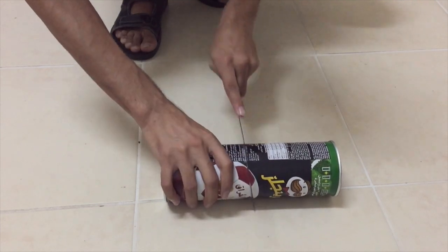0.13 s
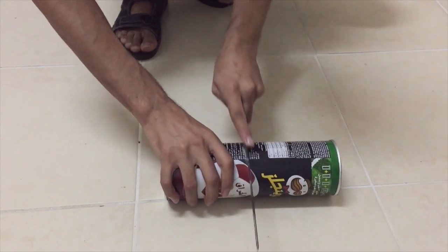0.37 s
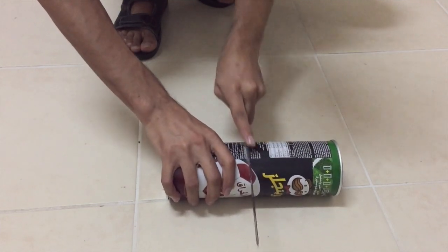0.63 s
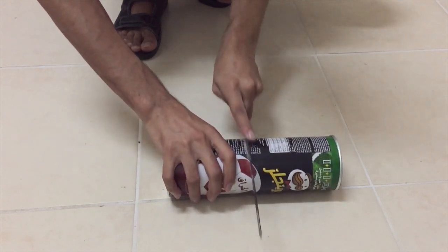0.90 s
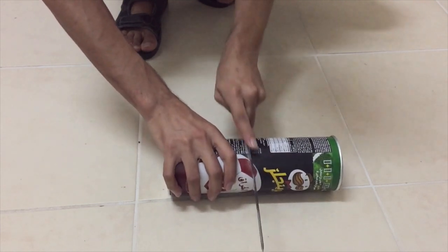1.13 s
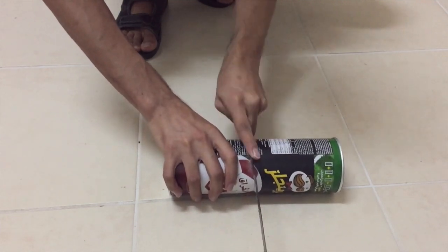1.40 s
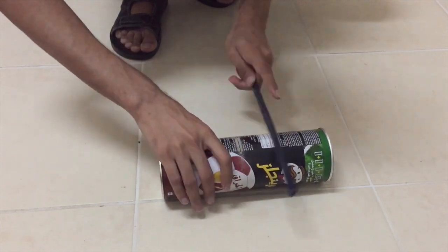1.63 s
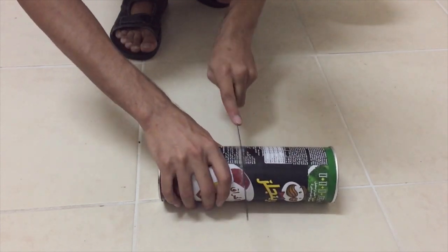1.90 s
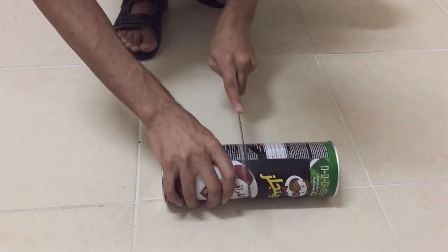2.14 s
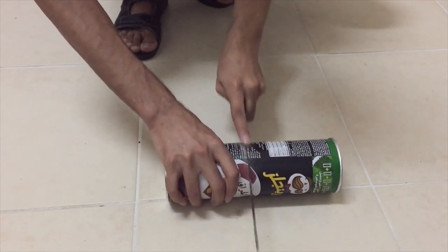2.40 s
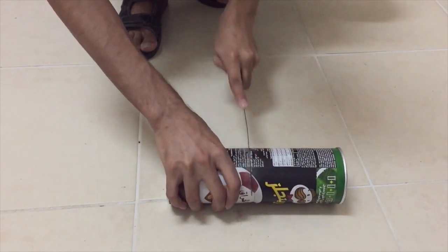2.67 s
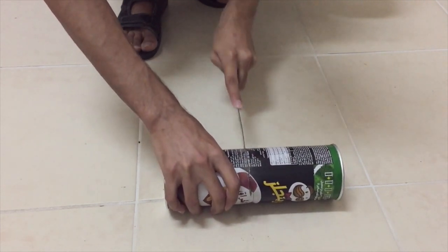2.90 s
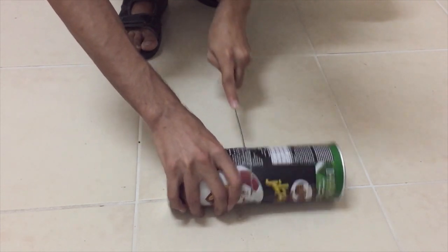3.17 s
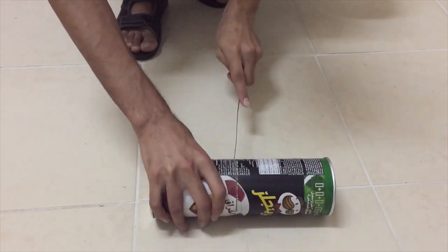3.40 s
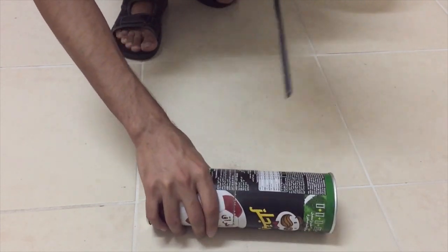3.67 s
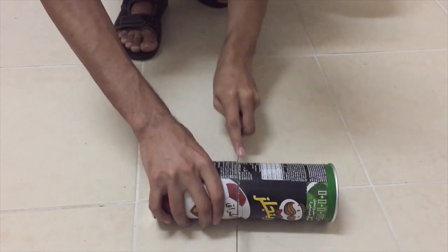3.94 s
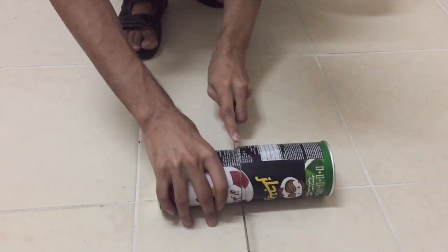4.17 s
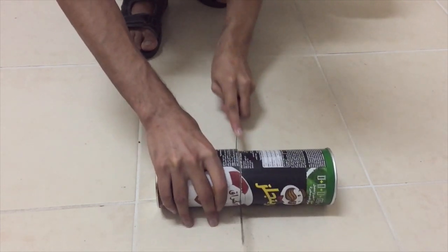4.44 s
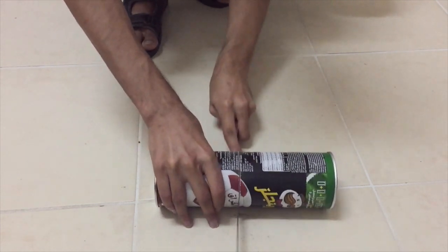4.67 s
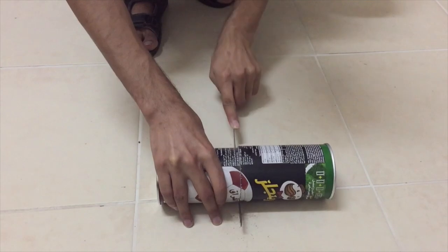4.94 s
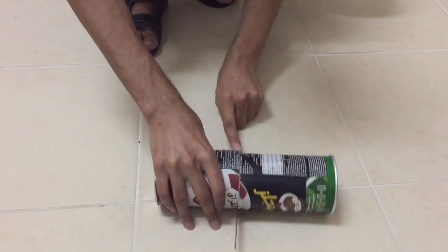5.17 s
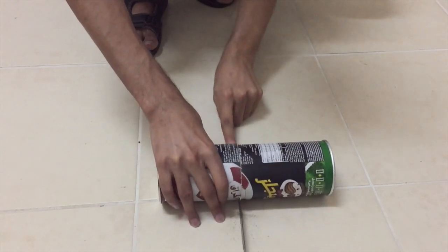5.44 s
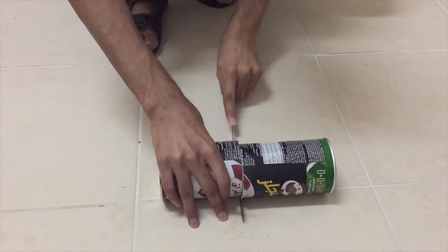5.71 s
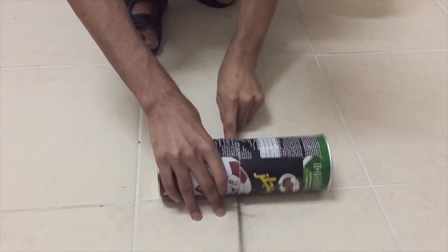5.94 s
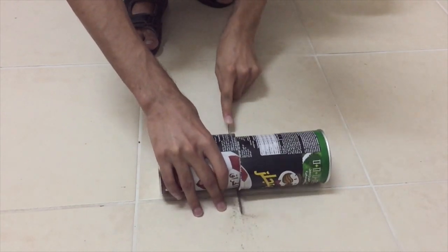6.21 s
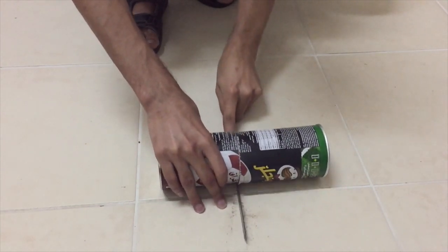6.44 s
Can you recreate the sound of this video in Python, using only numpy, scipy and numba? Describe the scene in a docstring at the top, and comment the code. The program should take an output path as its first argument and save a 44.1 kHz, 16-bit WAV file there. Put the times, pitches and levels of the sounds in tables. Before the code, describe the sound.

A thin hacksaw blade saws a hollow cardboard tube held on tiles in a small hard room. From 0 s come very quick, faint, dry strokes, about twenty-three a second, each with a small whine that rises and falls. They strengthen from 1 s and stop near 1.6 s, leaving faint scuffs, light taps and low hum. At 1.95 s sawing resumes, faster and steadily louder, fibres tearing and the tube ringing; it peaks around 3.1-3.3 s with soft thuds on the floor, ending on a sharp tap. Until 3.9 s there is only light dragging and tapping. A short burst to 4.1 s follows, then a long strong run from 4.25 to 5 s, hollow and clicking. After a brief gap, somewhat softer, higher-ringing strokes run from 5.15 s, with another tiny gap at 6.1 s, continuing to the cutoff at 6.6 s. Close phone microphone, short bright room tail.

```python
"""A bare hacksaw blade saws very quickly through a cardboard tube held on a tiled floor.
In each stroke the teeth whine up and down with the blade's speed (cosines at the tooth rate), fibres tear
and snap (shaped noise), and the hollow tube rings (resonances driven by both). Scrapes and light taps go
through the same tube, and short pulses thud on the tiles. Around it are a small hard room, a faint hum
and low noise, heard by a phone microphone."""
import sys
import numpy as np
from scipy import signal
from scipy.fft import rfft, irfft
from scipy.io import wavfile
from scipy.ndimage import uniform_filter1d
from numba import njit

SR = 44100
rng = np.random.default_rng(int(sys.argv[2]) if len(sys.argv) > 2 else 0)


def volts_from_db(level):
    """Convert decibel levels to linear amplitude ratios."""
    exponent = np.asarray(level, float) / 20
    return 10 ** exponent


def to_wav(s):
    """Save 16-bit WAV."""
    ch = np.atleast_2d(s).T  # columns
    pcm = np.round(np.clip(ch, -1, 1) * 32767)  # PCM
    wavfile.write(sys.argv[1], SR, pcm.astype(np.int16))


N = 290178  # length in samples
T = np.arange(N) / SR  # time in seconds

# The saw strokes. Each row: start in seconds, strength of the tearing in dB before mixing,
# top tooth rate in Hz, tooth whine over tearing in dB before mixing.
STROKES = [(0.027, -59, 2305, -2.5), (0.084, -59, 4345, -22), (0.127, -55, 2420, -5),
           (0.173, -58.5, 2350, -21), (0.216, -55.5, 2380, -22), (0.264, -58.5, 2686, -8),
           (0.309, -55.5, 2810, -11), (0.354, -57.5, 2330, -15), (0.397, -55.5, 2313, -16),
           (0.447, -58.5, 2920, -6), (0.492, -55.5, 2860, -6.5), (0.531, -58, 2382, -5),
           (0.58, -55, 2966, -11), (0.621, -58, 2397, -18), (0.666, -55.5, 2206, -8), (0.71, -58, 2990, -7),
           (0.758, -55.5, 2824, -10), (0.799, -58, 2873, -4), (0.852, -54, 2350, -2),
           (0.89, -59, 2420, -13), (0.935, -55, 2444, -4), (0.978, -57.5, 3015, -9), (1.024, -51, 3060, -4),
           (1.063, -57, 2366, -8), (1.109, -51, 3150, -10), (1.15, -54, 3350, 1), (1.199, -54, 3150, 3.5),
           (1.238, -54, 3300, -2), (1.286, -51, 3300, -3), (1.324, -55.5, 3097, -2.5),
           (1.371, -47, 3317, -1.5), (1.412, -56.5, 3280, -7), (1.455, -48.5, 3680, 3),
           (1.496, -48, 3400, -1), (1.547, -49, 3600, -9.5), (1.965, -47.5, 2785, -7),
           (1.99, -52, 2340, -19), (2.03, -49, 3650, -5), (2.072, -45, 3523, -4),
           (2.114, -50.5, 3165, -0.5), (2.159, -48.5, 3545, 3), (2.194, -50.5, 2992, -6),
           (2.238, -45.5, 3617, -2.5), (2.274, -56.5, 2300, 5), (2.314, -42.5, 3626, -3),
           (2.353, -47.5, 2392, -11), (2.392, -42.5, 3826, -4.5), (2.436, -48, 3582, -1),
           (2.47, -43, 3870, -2), (2.508, -43.5, 3178, -28), (2.548, -44.5, 3445, 0),
           (2.586, -46, 3208, -18), (2.625, -43, 3592, -4), (2.662, -46, 2443, -18),
           (2.701, -41.5, 3640, -5.5), (2.737, -46, 3728, -13), (2.776, -42, 2824, -2.5),
           (2.814, -50, 3173, -8), (2.85, -41, 2290, -9), (2.888, -49, 3258, -1), (2.927, -42, 2216, 1.5),
           (2.971, -50.5, 2186, -20.5), (3.006, -40.5, 2242, 0), (3.045, -49.5, 3578, -5),
           (3.082, -38, 2332, -26.5), (3.116, -45.5, 3580, -5), (3.147, -37, 4237, -4),
           (3.176, -40, 3525, -24), (3.203, -36.5, 4140, -1), (3.232, -45.5, 3517, -15),
           (3.259, -36, 4134, -3), (3.285, -43, 3500, -19), (3.317, -39.5, 4194, 0),
           (3.352, -42.5, 3306, -21), (3.929, -49, 4240, -24), (3.976, -45.5, 3210, -27),
           (4.015, -37.5, 4140, -5), (4.05, -40.5, 3900, -8), (4.079, -38, 3386, -19),
           (4.25, -51, 3104, -19), (4.295, -47, 2236, -15.5), (4.336, -40.5, 4330, -5),
           (4.37, -40, 3064, -10), (4.412, -40.5, 3252, -7), (4.444, -39, 4223, -9), (4.485, -39, 3320, -9),
           (4.514, -39.5, 3867, -7.5), (4.557, -43.5, 3194, -3), (4.588, -38.5, 3150, -11),
           (4.626, -38, 3371, -15), (4.661, -39, 3754, -6), (4.697, -37, 3408, -20), (4.729, -40, 3498, -6),
           (4.766, -37.5, 3373, -25), (4.8, -38.5, 4030, -7), (4.836, -38, 3703, -11),
           (4.874, -39, 4243, -24), (4.906, -38, 3808, -14), (4.944, -40, 3135, -17),
           (4.985, -44.5, 1695, -9), (5.109, -61, 4127, -6.5), (5.145, -46, 3775, -25),
           (5.177, -38, 3400, -12), (5.216, -47.5, 4343, -21), (5.245, -43, 4240, -22),
           (5.275, -43, 2738, -6), (5.303, -45, 2223, -20), (5.342, -42, 2350, -3), (5.372, -39, 3574, -13),
           (5.409, -45, 3021, -6), (5.44, -42, 2918, -6), (5.476, -45, 2850, -3.5),
           (5.509, -43, 4097, -7.5), (5.548, -45.5, 3153, -0.5), (5.581, -46, 3333, -3),
           (5.62, -46.5, 3314, 0.5), (5.659, -45.5, 4080, -7), (5.695, -46.5, 2822, -19),
           (5.726, -53.5, 4147, -17), (5.769, -58, 3972, -17), (5.794, -44.5, 2334, -30),
           (5.833, -45.5, 2373, -3.5), (5.863, -45, 3183, 2.5), (5.902, -46, 3228, -4),
           (5.936, -43.5, 3190, -2.5), (5.972, -45, 3072, -7), (6.005, -47.5, 3693, -3.5),
           (6.042, -47.5, 3370, 4.5), (6.076, -65.5, 3676, -3), (6.148, -54.5, 3800, -13),
           (6.192, -48, 2547, -7), (6.227, -41.5, 3196, -9.5), (6.262, -46, 2881, -4),
           (6.293, -42, 2972, -23), (6.33, -46, 3240, -1), (6.359, -46, 3217, -6), (6.393, -45.5, 3336, -1),
           (6.424, -43.5, 2446, -31.5), (6.461, -45, 3388, -4), (6.491, -44.5, 3562, 2.5),
           (6.524, -48, 3600, -5.5), (6.558, -45.5, 2364, -0.5)]
# How the hand works. Each row: time in seconds, time to turn round in ms, jolt at the stroke's start (0-1),
# roundness of the stroke's swell (a power), how strongly the wall rings under the other hand's grip in dB.
HAND = [(0, 3, 0.16, 1.15, 5), (1.6, 2.6, 0.17, 1.35, 3), (2.5, 3.5, 0.3, 1.7, 0), (3.0, 3, .3, 1.5, -2),
        (3.4, 2, 0.18, 1.36, -2), (4.0, 5, .25, 1.2, -2), (4.35, 10, 0.12, .65, -3),
        (4.7, 11, .15, .65, -4), (5, 7, 0.35, 1, -4), (5.4, 5.5, 0.35, 1.2, 0), (5.8, 5, 0.35, 0.95, -1),
        (6.58, 4.5, 0.42, 1.1, -1)]
# When the teeth sing. Each row: time in seconds, share of the stroke done when the whine is loudest (0-1).
WHINE_PEAK = [(0, .5), (1.4, .48), (1.55, .38), (2.5, .39), (3.3, .42), (4.5, .4), (5.6, .38), (6.58, .4)]
# The tube as the cut deepens. Each row: time in seconds, lower tube mode in Hz, its width in Hz,
# upper tube mode in Hz, upper mode's level in dB, tube over tearing in dB before mixing.
KERF = [(0, 1275, 55, 1870, 1, -3), (1.5, 1267, 55, 1920, 0.5, -1.5), (1.63, 1378, 80, 1968, 6, -4),
        (1.88, 1350, 80, 1952, -9, 19), (2.0, 1244, 60, 1867, -9, 6.5), (2.8, 1256, 70, 1897, 1.5, -1),
        (3.0, 1444, 100, 1975, 4, -1.5), (3.4, 1457, 100, 1927, 6, -2), (4.0, 1521, 100, 1876, -6.5, 2),
        (4.5, 1582, 100, 2090, -8, 1), (5.0, 1690, 60, 2099, -6, -2), (5.25, 1720, 60, 2099, -12, -3),
        (5.45, 1550, 120, 2095, -12, -3), (5.75, 1696, 45, 2369, -12, -4), (6.58, 1685, 45, 2369, -3, -7)]


def strokes():
    """Each stroke's speed follows a leaning half sine; harder strokes are shorter and start with more jolt."""
    longest_ms, last_ms, quicker_ms_per_db = 50, 34, 0.26
    bite_per_db = 1.2  # growth of the starting jolt, in dB per dB of hardness
    tube_per_db = -0.32  # harder strokes ring the tube more too, but by less than the tearing grows
    chirp_db = -16  # the first slow teeth of a stroke chirp upward
    song_width = 0.155  # half the length of the whine, as a share of the stroke

    rate, tear, whine, hollow = np.zeros((4, N))
    begin, level = np.transpose(STROKES)[:2]
    harder_db = level - uniform_filter1d(level, size=3)  # compared with the neighbours
    gap_ms = 1000 * np.diff(begin, append=N / SR)
    turn_ms, jolts, roundness = (column[(begin * SR).astype(int)] for column in follow(HAND)[:3])
    # a stroke fills the time to the next one less the hand's turn; before a pause it has a set length
    filling_ms = gap_ms - turn_ms - quicker_ms_per_db * harder_db
    length_ms = np.where(gap_ms > 65, last_ms, np.minimum(filling_ms, longest_ms))

    rows = zip(STROKES, harder_db, length_ms, jolts, roundness)
    for (s, db, top_hz, whine_db), harder, ms, jolt, power in rows:
        start = int(s * SR)
        done = np.arange(0, 1, 1000 / (ms * SR))[:N - start]  # share of the stroke done
        at = slice(start, start + len(done))
        swell = np.sin(np.pi * (0.04 + 0.96 * done) ** 0.82) ** power
        bite = jolt * volts_from_db(bite_per_db * harder) * np.exp(-done / 0.27)
        push = volts_from_db(db) * (swell + bite)
        lean = np.interp(s, [1.5, 5.5], [0.74, 0.84])  # early, shallow cuts reach top speed a little sooner
        rate[at] = top_hz * np.sin(np.pi * (0.04 + 0.96 * done) ** lean) ** 0.85
        tear[at] += push
        loudest = np.interp(s, *np.transpose(WHINE_PEAK))
        song = volts_from_db(db + whine_db) * np.exp(-((done - loudest) / song_width) ** 2)
        chirp = volts_from_db(db + chirp_db + 0.44 * harder) * np.exp(-done / 0.24)
        whine[at] += song + chirp
        hollow[at] += volts_from_db(tube_per_db * harder) * push

    # the blade still rubs while the hand turns round
    tear = tear + volts_from_db(-17) * uniform_filter1d(tear, size=SR // 24)
    return rate, tear, whine, hollow * volts_from_db(follow(KERF)[4])


# The whine's second harmonic. Each row: time in seconds, level against the first harmonic in dB.
OVERTONE = [(0, -3), (1.5, -2), (2.5, -6), (6.58, -9)]


def saw():
    """Teeth strike at an uneven tooth rate; the tearing pulses slightly with each tooth and drives the tube."""
    rate, tear, whine, hollow = strokes()
    wobble = smooth_noise(40)
    phase = 2 * np.pi * np.cumsum(rate * (1 + 0.048 * wobble)) / SR
    second = volts_from_db(follow(OVERTONE)[0]) * np.cos(2 * phase)
    third = volts_from_db(-13) * np.cos(3 * phase)
    teeth = np.cos(phase) + second + third

    # the blade catches and slips
    catching = volts_from_db(2.0 * smooth_noise(110))
    snagging = volts_from_db(3.1 * smooth_noise(110))

    puffs = 1 + 0.094 * np.cos(phase)
    rasp = tearing(tear * fibres(0.02, 3.1) * puffs * catching)
    strikes = fibres(0.011, 16.4) + 0.5 * teeth
    body = tube(hollow * strikes * snagging, wall_db=follow(HAND)[3])
    no_bass = signal.butter(3, 350, "high", fs=SR, output="sos")
    song = signal.sosfilt(no_bass, whine * teeth * snagging)
    return volts_from_db(-5.0) * rasp + volts_from_db(-13.5) * body + volts_from_db(3.5) * song


def fibres(share, most_db):
    """Noise in which a few fibres snap louder than the rest."""
    snaps = (rng.random(N) < share) * volts_from_db(most_db * rng.random(N))
    return unit(rng.standard_normal(N) * (1 + snaps))


# Tone of the broad tearing noise. Each row: frequency in Hz, relative level in dB.
TEAR_TONE = [(600, -40), (1200, -7), (2000, -2.5), (2400, 1.5), (2650, -10), (2950, 0), (3500, -1.5),
             (6000, -2), (8000, -5.5), (10500, -8.5), (13500, -6.5), (15500, -10.5)]
# The rasp changes as the blade sinks in. Each row: time in seconds, centre of the hump in Hz,
# hump level in dB before mixing, level of the fizz (the highest treble) in dB.
RASP = [(0, 8800, 10.5, 6.5), (1.5, 6640, 13, 7.5), (2.0, 8000, 2, -6.5), (2.4, 7490, 12, -0.5),
        (2.9, 6746, 1.5, 2.5), (3.4, 4505, 7.5, 0), (4.0, 4920, -8, -3.5), (4.5, 5500, 15, -4),
        (5.0, 4890, 0, -13), (5.6, 4600, 12, -1.5), (6.58, 5140, 2.5, 2.5)]
# Blade modes rung by the tearing. Each row: frequency in Hz, width in Hz of each filter pass,
# level in dB before mixing.
BLADE = [(3400, 1600, -15.5), (4140, 170, -13), (5510, 540, -17.5), (7150, 80, -24.5), (9040, 3400, -16),
         (13500, 1500, -20.5)]


def tearing(noise):
    """Torn fibres give a broad rasp with a moving hump, and shake the blade into its own ring."""
    centre_hz, hump_db, fizz_db = follow(RASP)
    broad = colour(noise, TEAR_TONE)
    dull = signal.sosfiltfilt(signal.butter(2, 11000, fs=SR, output="sos"), broad)
    fizz = broad - dull
    # the hump keeps shifting a little in pitch and level
    moving_hz = centre_hz * (1 + 0.12 * wander(25))
    hump = ring(noise, [(moving_hz, 1300, hump_db + 2 * wander(25))])
    blade = 0
    for mode in BLADE:
        once = ring(noise, [mode])
        blade = blade + svf(once, mode[0] + 0 * T, mode[1] + 0 * T)  # filtered twice: narrow feet
    return dull + volts_from_db(fizz_db) * fizz + volts_from_db(-14.0) * hump + volts_from_db(-6.0) * blade


# Wall modes, which do not follow the cut. Each row: middle frequency in Hz, width in Hz,
# relative level in dB before it wavers.
WALL = [(281.6, 51, -24), (386.4, 20, -24), (554, 93, -19), (737, 25, -13), (1030, 80, -10.5),
        (2333, 150, -6.5)]


def tube(drive, wall_db):
    """The hollow tube: two modes that mostly rise as the cut opens and waver as the wall flexes, plus the wall."""
    low_hz, low_width, high_hz, high_db = follow(KERF)[:4]
    low_flex, high_flex = [1 + 0.007 * wander(28) for _ in range(2)]
    low = (low_hz * low_flex, low_width, 2 * wander(20))
    high = (high_hz * high_flex, 85, high_db + 2 * wander(12))
    air = ring(drive, [low, high])
    wavering = [(hz * (1 + 0.007 * wander(19)), width, db + 3.23 * wander(25)) for hz, width, db in WALL]
    wall = volts_from_db(wall_db) * ring(drive, wavering)
    no_bass = signal.butter(2, 200, "high", fs=SR, output="sos")
    return signal.sosfilt(no_bass, air + wall)  # too small to radiate bass


# Tube and blade dragged about. Each row: start in seconds, length in seconds,
# strength in dB before mixing, hiss over that strength in dB before mixing, rise before the start in dB per ms.
SCUFFS = [(0, 0.064, -65.5, -10, .4), (1.655, 0.026, -73, -18, 1), (1.698, 0.006, -76, -14, .6),
          (1.762, 0.011, -82.5, -7, .6), (1.886, 0.036, -77, 3.5, 3), (1.947, 0.02, -64, -9, 1.5),
          (3.392, 0.041, -65, -3.5, .4), (3.505, 0.03, -73, -2.5, 1), (3.548, .012, -71, 0, 3),
          (3.572, 0.024, -73, -1, 1.5), (3.628, 0.04, -69, 0, 4), (3.679, 0.027, -67, 0.5, .5),
          (3.718, 0.014, -74, -9.5, .5), (3.905, .03, -71.5, -2, 1), (4.133, 0.045, -66, 4, .4),
          (4.209, .05, -73.5, -4, .4), (5.028, 0.027, -70, 4, .4), (5.114, 0.011, -76, -1, .4),
          (6.088, 0.065, -60, -9, .4)]
# The blade taps the tube or its teeth catch hard. Each row: time in seconds, strength in dB before mixing,
# hiss over that strength in dB before mixing.
TAPS = [(1.814, -48, -16), (1.932, -54, -8), (1.948, -56, -10), (3.329, -28, -6), (3.497, -55, -22),
        (3.549, -54, -9), (3.63, -44, -17), (3.638, -50, -16), (3.715, -45, -13.5), (3.861, -47.5, -9.5),
        (3.906, -43, -12), (3.929, -46, -11), (4.081, -39, 3), (4.2495, -37, -12), (4.297, -28, -5),
        (4.37, -29.5, -6), (4.444, -30, -3), (4.515, -29.5, -5), (4.518, -31, -5), (4.558, -35.5, -12),
        (4.591, -35, -1), (4.733, -36, -1), (5.042, -46.5, -3), (5.256, -33, -3), (5.444, -37, 4),
        (5.625, -32, -2), (5.661, -31, 0), (5.727, -29.5, -7.5), (5.736, -34, -13), (5.795, -37, -0.5),
        (5.834, -32, -1), (6.045, -36, 3), (6.077, -30, -7), (6.229, -36, 0), (6.24, -37, 0),
        (6.425, -33, -1.5)]
# The moments in each tap at which it touches, in samples after the tap's time.
BOUNCE = (0, 30, 62)
# The gripped wall's short knock under a tap. Each row: frequency in Hz, width in Hz, relative level in dB.
KNOCK = [(850, 200, -12), (1500, 350, 0), (1850, 260, -1), (3080, 610, -4.5), (3970, 1100, -13)]
# The tube knocks against the tiles. Each row: time in seconds, peak in dB before the room adds its tail.
THUDS = [(3.012, -82), (3.158, -76), (3.21, -50), (3.272, -62), (3.334, -74.5), (4.023, -78), (4.089, -76),
         (4.299, -61), (4.456, -68), (4.835, -71)]


def handling():
    """Dragging and tapping send noise through the tube and the rasp; knocks ring the wall, pulses thud on tiles."""
    scrape, hiss, thuds, knocks = np.zeros((4, N))
    for s, length, db, hiss_db, rise in SCUFFS:
        before_ms = 1000 * np.maximum(s - T, 0)
        after_ms = 1000 * np.maximum(T - s - length, 0)
        drag = volts_from_db(db - rise * before_ms - 1.3 * after_ms)  # fades by 1.3 dB per ms
        scrape += drag
        hiss += volts_from_db(hiss_db) * drag
    for s, db, hiss_db in TAPS:
        contact = (T >= s) * volts_from_db(db - 60 * np.maximum(T - s, 0) / 0.02)  # down 60 dB in 20 ms
        scrape += volts_from_db(-9.5) * contact
        knocks[int(s * SR) + np.array(BOUNCE)] += volts_from_db(db + 0.5) * rng.uniform(0.4, 1, size=3)
        hiss += volts_from_db(hiss_db) * contact
    for s, db in THUDS:
        pulse = np.exp(-((T - s) / 0.00035) ** 2)
        thuds += volts_from_db(db) * np.cos(2 * np.pi * 90 * (T - s)) * pulse
    rough = fibres(0.0035, 11.0) * volts_from_db(3.6 * wander(90))
    body = tube(volts_from_db(-10.0) * scrape * rough, wall_db=1.5)
    grit = fibres(0.082, 10.6) * volts_from_db(3.23 * wander(120))
    rasp = tearing(volts_from_db(-4.5) * hiss * grit)
    return body + rasp + thuds + ring(knocks, KNOCK)


def room(x):
    """Tiles and walls: a short dense tail of noise, duller as it dies."""
    t60_s, tail_db = 0.125, -8.5  # time for the bright part to drop 60 dB; tail against the direct sound
    t = T[:SR // 2]
    bright, dull = rng.standard_normal((2, len(t)))
    dull = 0.57 * uniform_filter1d(dull, size=5) * volts_from_db(16 * t)  # dies 16 dB per second more slowly
    tail = (bright + dull) * volts_from_db(-60 * t / t60_s)
    faded_in = tail * np.minimum(t / 0.00051, 1) / np.linalg.norm(tail)
    return x + volts_from_db(tail_db) * signal.fftconvolve(x, faded_in)[:N]


# The hum's swelling and sinking. Each row: time in seconds, average (rms) level in dB before it wavers.
HUM = [(0, -92), (.4, -85), (1.2, -88), (1.7, -82), (2.2, -84), (2.9, -87.5), (3.3, -97), (3.6, -92),
       (4.2, -87.5), (5, -90), (6.58, -90)]
# Tone of the low room noise. Each row: frequency in Hz, relative level in dB.
FLOOR = [(30, -28.5), (100, -19), (150, -12), (210, -7), (290, -1), (400, -5), (530, -27), (1300, -20),
         (3000, -28.5), (15000, -37)]


def background():
    """A faint hum, one sine that swells, sinks and wavers, over low coloured noise."""
    hum_hz, floor_db = 194.6, -87
    level_db = np.interp(T, *np.transpose(HUM)) + 1.6 * wander(9.7)
    hum = np.sqrt(2) * volts_from_db(level_db) * np.sin(2 * np.pi * hum_hz * T)
    return hum + volts_from_db(floor_db) * unit(colour(rng.standard_normal(N), FLOOR))


def unit(x):
    """Scale a signal to an rms of 1."""
    return x / np.sqrt(np.mean(x ** 2))


def smooth_noise(size):
    """Noise averaged over size samples, so that it changes more slowly; spread 1."""
    return unit(uniform_filter1d(rng.standard_normal(N), size=size))


def wander(rate):
    """Slow chance, about rate changes a second, spread 1."""
    hold = int(SR / rate)
    steps = np.repeat(rng.standard_normal(N // hold + 1), hold)
    return unit(uniform_filter1d(steps, hold // 2)[:N])


def follow(table):
    """The columns of a table after its time column, filled in sample by sample."""
    seconds, *columns = np.transpose(table)
    return [np.interp(T, seconds, column) for column in columns]


def colour(x, points):
    """Shape a signal by (Hz, dB) points; white noise keeps its power."""
    hz, db = np.transpose(points)
    f = np.maximum(np.fft.rfftfreq(len(x), 1 / SR), 1)
    gain = unit(volts_from_db(np.interp(np.log(f), np.log(hz), db)))
    return irfft(rfft(x) * gain, len(x))


@njit
def svf(x, hz, width):
    """A resonance: band-pass filter with a moving centre, gain 1 at the centre."""
    y, band, low = np.empty(len(x)), 0., 0.
    for i in range(len(x)):
        g = np.tan(np.pi * hz[i] / SR)
        k = width[i] / hz[i]
        v = (band + g * (x[i] - low)) / (1 + g * (g + k))
        band = 2 * v - band
        low = low + 2 * g * v
        y[i] = k * v
    return y


def ring(x, modes):
    """Sum of (Hz, width in Hz, dB) resonances, scaled so that width does not change the noise power passed."""
    total = 0
    for k, (hz, width, db) in enumerate(modes):
        sign = (-1) ** k  # neighbours in opposite phase
        even_power = np.sqrt(SR / np.pi / width)
        total = total + sign * volts_from_db(db) * svf(x, hz + 0 * T, width + 0 * T) * even_power
    return total


def scene():
    """Sawing and handling sound in the room; the background is added without its tail."""
    mono = room(saw() + handling()) + background()
    return mono[None]


def low_pass(x):
    """Removes everything above the highest recorded frequency."""
    return signal.sosfilt(signal.butter(12, 16530, fs=SR, output="sos"), x)


def record(dry):
    """The phone cuts the top sharply, just below 16 kHz."""
    steep = signal.ellip(12, 0.3, 45, 15760, fs=SR, output="sos")
    heard = signal.sosfilt(steep, dry)
    return low_pass(heard)


dry = scene()
out = record(dry)
to_wav(out)
```